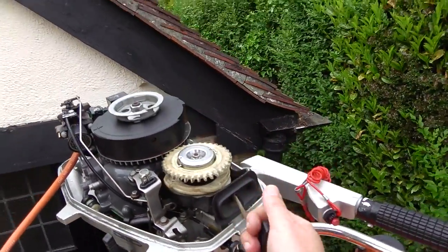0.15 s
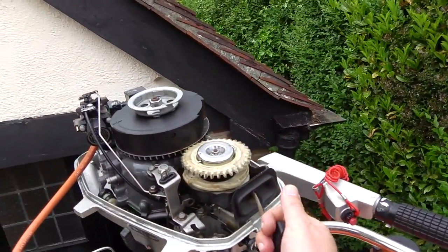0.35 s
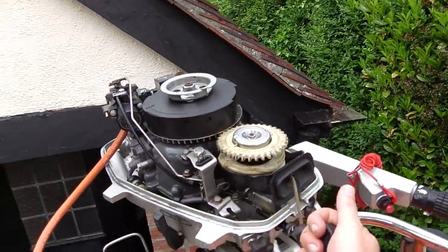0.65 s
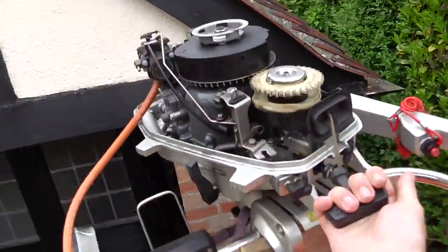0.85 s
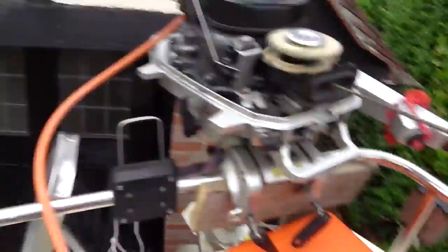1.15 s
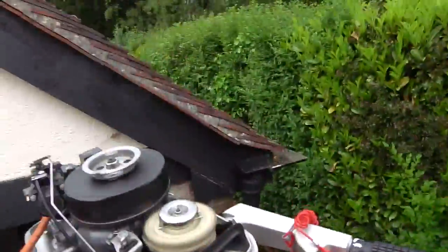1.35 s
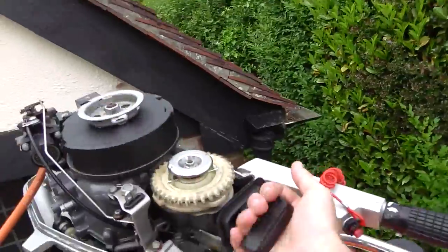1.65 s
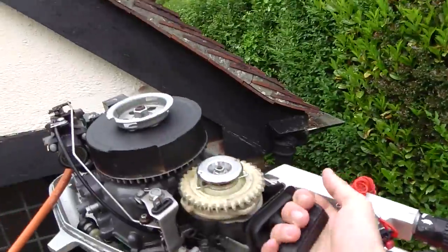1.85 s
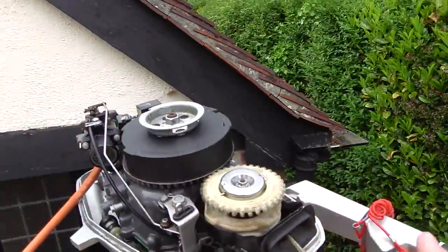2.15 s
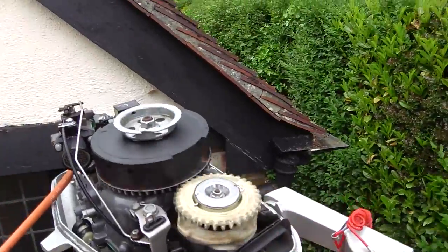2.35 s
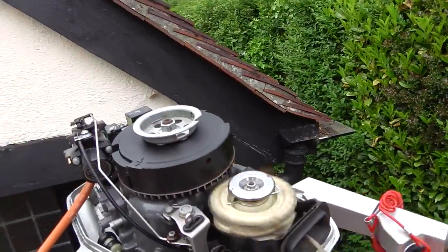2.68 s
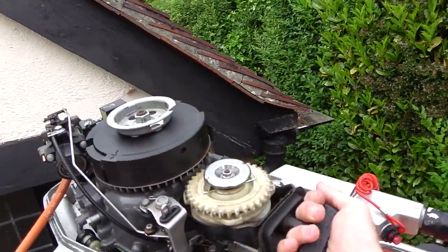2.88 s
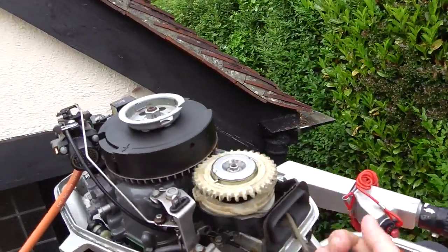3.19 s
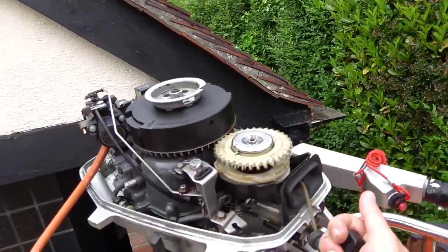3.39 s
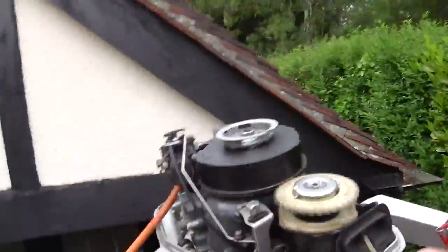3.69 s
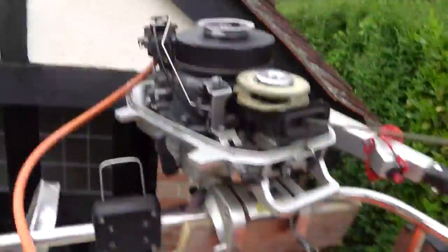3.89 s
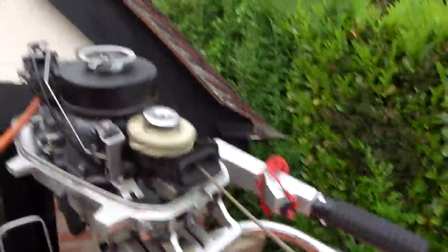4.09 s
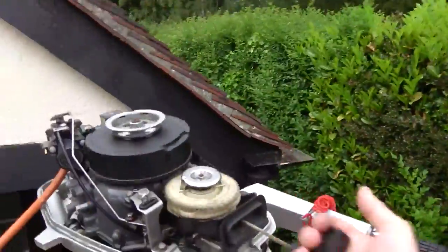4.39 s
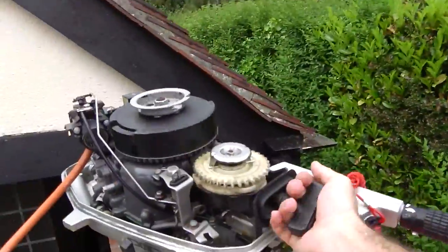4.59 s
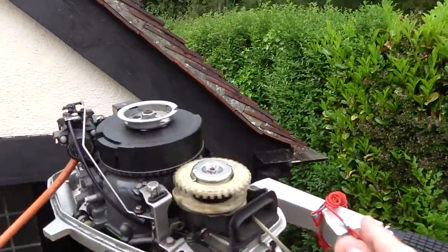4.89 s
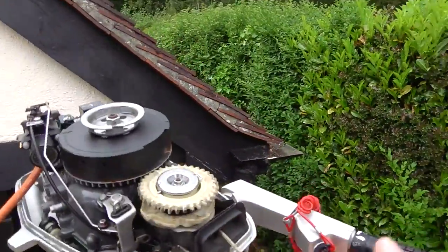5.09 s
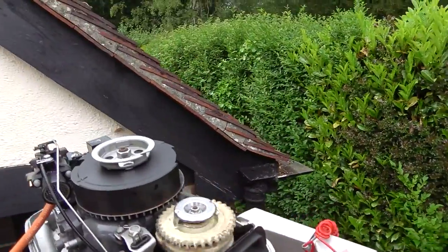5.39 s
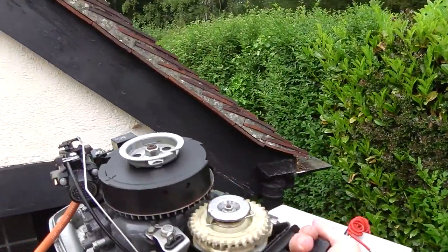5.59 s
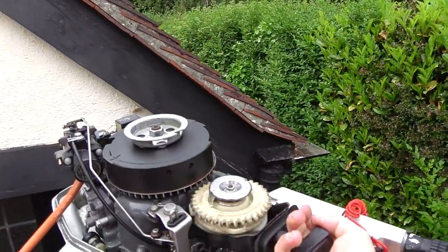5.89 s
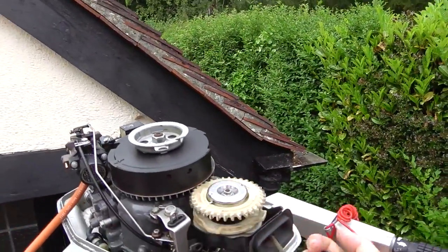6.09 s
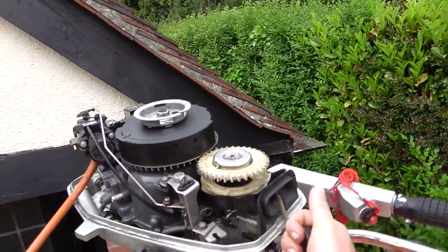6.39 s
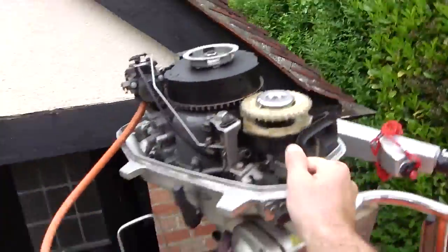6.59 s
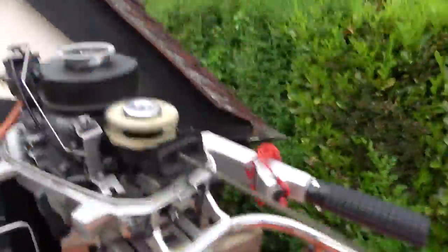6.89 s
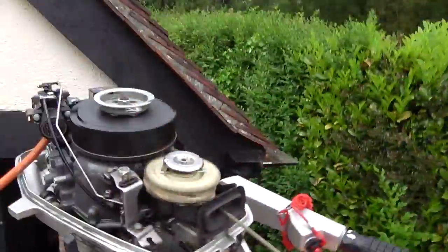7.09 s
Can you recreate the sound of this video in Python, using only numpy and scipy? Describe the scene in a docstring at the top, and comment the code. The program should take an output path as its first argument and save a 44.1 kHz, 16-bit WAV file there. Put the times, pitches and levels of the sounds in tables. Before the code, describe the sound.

Three rasping rope pulls spin a small engine that coasts down without firing, with gear clacks and soft rope slides between the pulls.

```python
"""In a garden, an uncovered outboard engine on a stand is pull-started three times and never catches.
The rope spins the starter gear (pinion) against the flywheel: filtered noise that speeds up and coasts down.
The cylinders puff through the exhaust (wavering tones and air), and the pinion clatters out (short noise hits).
The rope winds back; between pulls it is eased out until the pinion clacks into mesh.
A thin hiss of narrow noise bands goes on throughout, over a faint outdoor rumble."""
import sys
import numpy as np
from scipy import signal
from scipy.fft import rfft, irfft, next_fast_len
from scipy.io import wavfile
from scipy.ndimage import map_coordinates

SR = 44100
rng = np.random.default_rng(int(sys.argv[2]) if len(sys.argv) > 2 else 0)


def output_pcm(signal):
    """Save a mono or channel-first signal as 16-bit PCM at the path in sys.argv[1].

    Samples are clipped to [-1, 1] before scaling.
    """
    pcm = np.clip(np.atleast_2d(signal).T, -1, 1) * 32767
    wavfile.write(sys.argv[1], SR, np.round(pcm).astype(np.int16))


N = 319725
TIME = np.arange(N) / SR


# hard pulls on the rope: yank t/s, full speed t/s, let go t/s, flywheel stopped t/s, level/dB, jolt level/dB
ROPE_PULLS = [(1.022, 1.11, 1.29, 1.75, -13.8, -32.5), (3.759, 3.9, 4.046, 4.65, -13.5, -21),
              (6.709, 6.83, 6.985, 7.5, -13.5, -19)]
# rope eased out or winding back: start t/s, fastest t/s, end t/s, level/dB, treble relative to gear level/dB
ROPE_SLIDES = [(.92, 1.03, 1.1, -33, -8), (2.16, 2.43, 2.54, -21.5, -10.5), (2.438, 2.5, 2.68, -40, -8),
               (2.68, 2.781, 3.04, -34, -3), (4.45, 4.72, 4.9, -31.5, -14), (4.93, 5.069, 5.17, -27, -14),
               (5.1, 5.15, 5.36, -39, -9.5), (5.42, 5.513, 5.68, -38.5, 0), (6.45, 6.679, 6.74, -44, 4)]
# the gear unloads when let go, then coasts this much quieter and slows
LET_GO_S, COAST_DB, RUN_DOWN_DB_PER_S = .04, -7.5, 19
PULL_TREBLE_DB, COAST_TREBLE_DB = -6.5, -8.5  # rope fibres relative to the gear
SPIN_S, SPIN_DB, SPIN_TREBLE_DB = .09, -23, -11  # the thrown pinion whirrs on its shaft for a moment


def drive():
    """Strength of the gear's whirr and the rope's rasp: pulls speed up, hold and coast; slides swell and stop."""
    moves = []  # (gear strength over time, rope treble dB relative to it)
    for start, fastest, end, db, treble_db in ROPE_SLIDES:
        swell = stroke(start, fastest, fastest, end) ** 1.3
        moves.append((amp(db) * swell, treble_db))
    for yank, full, let_go, stopped, db, _ in ROPE_PULLS:
        pulled = stroke(yank, full, let_go, let_go + LET_GO_S)
        moves.append((amp(db) * pulled, PULL_TREBLE_DB))
        slowing = amp(COAST_DB - RUN_DOWN_DB_PER_S * np.maximum(TIME - let_go, 0))
        coasting = slowing * stroke(let_go, let_go + LET_GO_S, stopped - LET_GO_S, stopped)
        moves.append((amp(db) * coasting, COAST_TREBLE_DB))
    for s, *_ in PINION_THROWS:
        spin = stroke(s, s, s + SPIN_S / 2, s + SPIN_S)
        moves.append((amp(SPIN_DB) * spin, SPIN_TREBLE_DB))
    gear = sum(gain for gain, _ in moves)
    rope = sum(gain * amp(treble_db) for gain, treble_db in moves)
    return gear, rope


# where the starter housing resonates: f/Hz, width/Hz, starting level/dB
HOUSING_MODES = [(754, 145, -17.5), (1160, 310, -14), (1566, 180, -10), (1987, 660, -1.5), (2581, 53, -7),
                 (2940, 280, -9), (3157, 86, -9), (3780, 220, -9.5)]
# tone of the rope's rasp: f/Hz, level per Hz/dB
ROPE_RASP = [(3000, -5.5), (4000, 0), (4620, -4), (5410, 2), (6110, -1.5), (9830, -3.5), (12200, -9),
             (14300, -10.5), (16000, -19)]


def starter():
    """Rope and gear teeth rasp through the starter housing; the rope's fibres add treble."""
    gear, rope = drive()
    # a louder movement counts as a faster one, so the teeth mesh more often
    speed = np.sqrt(gear / amp(-13))
    tooth_hz = 930 * speed * (1 + 0.0486 * wobble(60))
    teeth = amp(2.0 * np.sin(2 * np.pi * np.cumsum(tooth_hz) / SR))
    whirr = 0
    for hz, width, db in HOUSING_MODES:
        # each mode swells and fades unevenly; slow rubbing favours the low ones
        tilt_db = 9.5 * (speed - 1) * np.log2(hz / 1600)
        mode = resonant(teeth * grit(spread_db=2), [(hz, width, 0)])
        whirr = whirr + amp(db + 5.17 * wobble(22) + tilt_db) * mode
    fibres = coloured(teeth * grit(spread_db=2), ROPE_RASP)
    return amp(1.8 * wobble(130)) * (gear * radiated(whirr) + rope * fibres)


def radiated(x):
    """The small housing sends out its middle range best and weakens towards both ends."""
    radiation = [(250, -4), (650, -2.0), (3800, -6), (6000, -14.5)]  # f/Hz, level/dB
    return filtered(x, lambda hz: amp(along(radiation, hz)))


# the last of the rope zips in: start t/s, full speed t/s, braking t/s, end t/s, level/dB
ROPE_ZIP = (1.75, 1.79, 1.8273, 1.87, -14.5)


def rewind():
    """The spring whips the rope's end through its guide, heard as gritty noise through the guide's resonances."""
    start, full, braking, end, db = ROPE_ZIP
    guide = [  # f/Hz, width/Hz, level/dB
        (855, 180, -13.5), (2190, 350, -0.5), (2920, 240, 2.5),
        (3840, 360, -6), (5420, 470, -11.5), (9300, 1800, -16.5)]
    return amp(db) * stroke(start, full, braking, end) * resonant(grit(spread_db=-2.5), guide)


# pinion and pawl contacts; square ones knock, glancing ones tick, scraping ones last longer:
# t/s, clack level/dB, knock relative level/dB, t60/s (time to fade by 60 dB)
CONTACTS = [(1.345, -13, 2, 0.047), (1.367, -13, -20, 0.053), (1.472, -18, -23, .025),
            (1.615, -17, -8, .018), (1.682, -13, -7.5, .02), (2.015, -26, -21, 0.032),
            (2.127, -15, 1.5, .03), (2.627, -25.5, -5, .034), (2.659, -25.5, -8, 0.026),
            (2.735, -16.5, -10, 0.054), (2.954, -31, -3.5, .1), (3.193, -20.5, -23, .026),
            (3.3064, -15, 4.5, .024), (4.233, -20.5, -3, .13), (4.304, -19, -4, 0.084),
            (4.355, -15.5, -5.5, 0.072), (4.4271, -16.5, -13, 0.0079), (4.461, -23, -2, .042),
            (4.863, -22.5, -10.5, 0.033), (4.9394, -11, 0.5, 0.017), (4.948, -17, -4, .018),
            (5.268, -35.5, 4.5, 0.066), (5.36, -31.5, -20, .03), (5.48, -33, -18, 0.03),
            (5.519, -31, -16, 0.051), (5.549, -16, -3, .036), (5.713, -20.5, -8, 0.03),
            (5.964, -32, -22, .036), (6.119, -19.5, 6, .04), (6.408, -37, 5.5, .05),
            (7.074, -14, -15, 0.075), (7.093, -14, 1.5, .046), (7.187, -20, -1.5, 0.039),
            (7.242, -11.5, -12.5, .06)]
# the pinion is thrown out of mesh after each pull: t/s, clack level/dB, knock relative level/dB, chime level/dB
PINION_THROWS = [(1.509, -14, -15.5, -2), (4.099, -4.5, -4, -13), (7.0384, -5, -.5, -20)]
BITE_S, BITE_DB = .05, -19.5  # the pinion bites this long after the yank
THROW_T60_S, CATCH_S, CATCH_DB = 0.05, .0055, -14.5  # a tooth catches just before the pinion flies out
TICK_DB, TICK_PER_KNOCK = -4, -0.23  # tick relative to clack; dB of tick per dB of knock


def blows():
    """Every pinion contact: (s, clack dB, knock dB relative, tick dB relative, t60 s); more knock means less tick."""
    rows = list(CONTACTS)
    rows += [(yank + BITE_S, BITE_DB, -6, .04) for yank, *_ in ROPE_PULLS]
    for s, db, knock_db, _ in PINION_THROWS:
        rows.append((s - CATCH_S, CATCH_DB, knock_db + 6.5, .04))
        rows.append((s, db, knock_db, THROW_T60_S))
    return [(s, db, knock_db, TICK_DB + TICK_PER_KNOCK * knock_db, t60)
            for s, db, knock_db, t60 in rows]


# resonances of the plastic pinion: f/Hz, width/Hz, level/dB
PINION_MODES = [(618, 265, -7.5), (778, 73, 0.5), (1145, 180, 7), (1522, 290, 1.5)]
# tone of the clack in the housing: f/Hz, level per Hz/dB
CLACK_TONE = [(1200, -45), (1800, 1.5), (2050, 5.5), (2300, 4.5), (2900, 4), (3600, 4), (4100, 0.5),
              (4800, -75)]
# tone of the tick on the flywheel's teeth: f/Hz, level per Hz/dB
TICK_TONE = [(3300, -10.5), (4200, 4.5), (5100, 7.5), (6500, 1.5), (10000, 1), (12500, -4), (14300, 2),
             (16000, -24)]


def contacts():
    """Each contact knocks the plastic pinion, clacks in the housing and ticks on the flywheel's teeth."""
    knock = resonant(noise(), PINION_MODES)
    clack = coloured(noise(), CLACK_TONE)
    tick = coloured(grit(spread_db=-2.0), TICK_TONE)
    track = np.zeros(N)
    for s, db, knock_db, tick_db, t60 in blows():
        for carrier, part_db, graze_db in ((knock, knock_db, -19), (clack, 0, -22), (tick, tick_db, -26)):
            level = amp(db + part_db)
            add(track, s, level * struck(carrier, s, t60, attack=0.00032, head=0.0051))
            # the teeth graze each other just before they meet: a short hit turned backwards
            graze = struck(carrier, s - .1, .025, attack=.0004, head=.008)[:SR // 50][::-1]
            add(track, s - len(graze) / SR, level * amp(graze_db) * graze)
    return track + rattle(clack + amp(-11) * knock + amp(-9.5) * tick)


RATTLE_PER_S, RATTLE_DB, RATTLE_SPREAD_DB = 34, -20.5, 9  # rate, strongest start level, random range below it


def rattle(light):
    """Light, uneven contacts of the freed pinion, fading as the flywheel runs down."""
    track = np.zeros(N)
    for _, _, let_go, stopped, _, _ in ROPE_PULLS:
        for slot, (late, force) in enumerate(rng.random(size=(24, 2))):
            since = LET_GO_S + (slot + late) / RATTLE_PER_S
            s = let_go + since
            db = RATTLE_DB - RATTLE_SPREAD_DB * force - RUN_DOWN_DB_PER_S * since / 2
            if s < min(stopped, TIME[-SR // 100]):
                add(track, s, amp(db) * struck(light, s, 0.033, attack=0.00056, head=0.0064))
    return track


# ringing tones of the steel flywheel: f/Hz, level/dB, t60/s
FLYWHEEL_TONES = [(2546, 0, .19), (2778, -4, .16), (3122, -13, .2), (10140, -24, .25)]
# the pawl slips off a tooth and its spring pings: t/s, level/dB
SPRING_PINGS = [(1.367, -23), (2.738, -17), (5.521, -31), (5.553, -23), (7.093, -26)]
PING_HZ, PING_T60_S, PING_SHARE_DB = 14140, 0.05, -27  # contacts stir the spring only by this share of their tick


def steel():
    """Contacts ring the flywheel faintly; the pinion dropping out sets it chiming; the pawl spring pings."""
    track = np.zeros(N)
    t = np.arange(SR // 2) / SR
    strikes = [(s, chime_db) for s, _, _, chime_db in PINION_THROWS]
    strikes += [(s, db - 24) for s, db, *_ in CONTACTS]
    for s, db in strikes:
        for hz, level_db, t60 in FLYWHEEL_TONES:
            fade = np.exp(-np.log(1000) * t / t60)
            tone = np.sin(2 * np.pi * (hz * t + rng.random()))
            add(track, s, amp(db + level_db + rng.normal(0, 1)) * fade * tone)
    # the small pawl spring adds a short, very high ring
    spring = resonant(noise(), [(PING_HZ, 160, 0)])
    pings = list(SPRING_PINGS)
    pings += [(s, db + tick_db + PING_SHARE_DB) for s, db, _, tick_db, _ in blows()]
    for s, db in pings:
        add(track, s, amp(db) * struck(spring, s, PING_T60_S, attack=.0004, head=.006))
    return track


# compression let out through the exhaust: t/s, level/dB, suddenness 0-1
EXHAUST_PUFFS = [(1.158, -21, .22), (1.278, -22.5, 0.5), (1.41, -35, .3), (2.47, -39, 0.3),
                 (2.648, -17, .63), (3.942, -17, .15), (4.06, -29, 0.45), (4.185, -29, .25),
                 (5.16, -35, 0.28), (5.352, -14, 0.66), (6.874, -23, 0.1), (6.98, -29, 0.52),
                 (7.125, -25.5, .48)]
# tones of the exhaust pipe, lowest first: f/Hz, level/dB
PIPE_MODES = [(101, 2), (183, 3), (262, -4), (335, -18), (680, -11.5)]
PIPE_T60_S, PIPE_GROWTH_PER_DB = .21, 0.0566  # the pipe's ring after a -20 dB puff; stronger puffs ring longer


def exhaust():
    """Released compression rings the exhaust pipe; a sudden release reaches its upper modes and rushes with air."""
    track = np.zeros(N)
    # seconds passed for each mode, running slightly unevenly so its pitch wavers
    waver = [np.cumsum(1 + 0.092 * wobble(90)) / SR for _ in PIPE_MODES]
    rush = coloured(noise(), [(400, 7), (800, 2.0), (3500, -0.5), (5000, -17.0)])
    for s, db, sudden in EXHAUST_PUFFS:
        start = round(s * SR)
        t60 = PIPE_T60_S * np.exp(PIPE_GROWTH_PER_DB * (db + 20))
        ring = 0
        for k, (hz, level_db) in enumerate(PIPE_MODES):
            share = sudden if k else 1
            ring = ring + amp(level_db) * share * np.sin(2 * np.pi * hz * (waver[k] - waver[k][start]))
        add(track, s, amp(db) * struck(ring, s, t60, attack=0.0027, head=0.056))
        add(track, s, amp(db - 7) * sudden * struck(rush, s, t60, attack=0.011, head=0.063))
    return track


def squeak():
    """One brief squeak at the start of the strongest puff: a pure tone in a bell-shaped burst."""
    burst = np.exp(-((TIME - 5.356) / 0.0049) ** 2)
    return amp(-17.0) * burst * np.sin(2 * np.pi * 2300 * TIME)


# resonances of the wooden stand: f/Hz, width/Hz, level/dB
STAND_MODES = [(200, 225, 0), (370, 150, 1.5), (533, 77, -1), (722, 470, -6.5)]
RUMBLE_DB, RUMBLE_TAIL_S = -41.5, .1  # rumble under a turning engine; it outlasts the flywheel this long
BITE_JOLT_DB, JOLT_T60_S = -8.5, 0.17  # the pinion's bite jolts the stand again, relative to the yank


def stand():
    """The yank shakes the engine on its wooden mount, which rumbles on while the flywheel turns."""
    wood = resonant(noise(), STAND_MODES)
    turning = sum(stroke(yank, full, let_go, stopped + RUMBLE_TAIL_S)
                  for yank, full, let_go, stopped, _, _ in ROPE_PULLS)
    track = amp(RUMBLE_DB) * turning * wood
    for yank, *_, jolt_db in ROPE_PULLS:
        for s, db in ((yank, jolt_db), (yank + BITE_S, jolt_db + BITE_JOLT_DB)):
            add(track, s, amp(db) * struck(wood, s, JOLT_T60_S, attack=0.0016, head=0.056))
    return track


# how long the walls' answer lasts: f/Hz, t60/s
WALL_DECAY = [(1500, 0.2), (14000, 0.038)]


def walls(x):
    """The house wall and eaves answer: noise that dies away sooner in the treble is used as an echo."""
    hz, t, z = signal.stft(rng.standard_normal(SR // 2), SR, nperseg=256)
    fade = np.exp(-np.log(1000) * t / along(WALL_DECAY, hz)[:, None])
    tail = signal.istft(z * fade, SR, nperseg=256)[1]
    return signal.fftconvolve(x, tail / np.linalg.norm(tail))[:N]


# steady hiss bands: f/Hz, width/Hz, level before the overall hiss level/dB
STEADY_HISS = [(2236, 66.5, 9), (3910, 126, 2.5), (11540, 340, 1.5), (13700, 240, -6)]
# drifting hiss bands: f/Hz, width/Hz, level before the overall hiss level/dB
DRIFTING_HISS = [(5620, 590, -3.5), (7135, 283, 4)]
# low hum at the start: f/Hz, width/Hz, level/dB, fading from t/s, gone t/s
LOW_HUM = (65, 5, -44.5, 0.7, 1)
# outdoor rumble over time, before a slight wobble: t/s, level/dB
GARDEN_LEVEL = [(0, -41), (.9, -43.5), (1.9, -44), (3.5, -45), (6.4, -41)]
# tone of the outdoor rumble: f/Hz, level per Hz/dB
GARDEN_TONE = [(20, -32), (66, 9.5), (105, 3), (200, -1.5), (450, -3.5), (1000, -3), (1800, -8),
               (3000, -11.5), (9000, -20.5), (16000, -15)]
HISS_DB, HISS_DIP_DB, HISS_LIFT = -55.5, 9, .1  # each pull makes the hiss quieter and its drifting bands higher
HISS_RECOVERY_S, HISS_REST, HISS_WANDER = 1.6, 0.99, 0.0065  # return time; pitch ratio at rest; random share


def background():
    """Outdoor rumble, a fading hum, and a thin hiss that dips with each pull; its drifting bands rise and sink."""
    dip = sum(stroke(yank, stopped, stopped, stopped + HISS_RECOVERY_S)
              for yank, _, _, stopped, _, _ in ROPE_PULLS)
    pitch = HISS_REST + HISS_LIFT * dip + HISS_WANDER * wobble(2)
    # reading the noise faster raises its pitch
    drifting = map_coordinates(banded(DRIFTING_HISS), [np.cumsum(pitch)], mode="mirror")
    hiss = amp(HISS_DB - HISS_DIP_DB * dip) * (banded(STEADY_HISS) + drifting)
    hz, width, db, fading, gone = LOW_HUM
    hum = amp(db) * (1 - ramp(fading, gone)) * unit(banded([(hz, width, 0)]))
    rumble = amp(curves(GARDEN_LEVEL)[0] + wobble(22)) * coloured(noise(), GARDEN_TONE)
    return hiss + hum + rumble


def amp(db):
    """Decibels to a plain gain."""
    return 10 ** (np.asarray(db) / 20)


def unit(x):
    """x scaled to rms 1."""
    return x / np.sqrt(np.mean(x ** 2) + 1e-20)


def along(points, hz):
    """Straight lines between (Hz, value) points on a log frequency axis."""
    f, v = np.transpose(points)
    return np.interp(np.log(hz + 1), np.log(f + 1), v)


def curves(rows):
    """One value per sample for each column after the time."""
    s, *cols = np.transpose(rows)
    return [np.interp(TIME, s, c) for c in cols]


def ramp(start, end):
    """A straight rise from 0 at start to 1 at end."""
    return np.clip((TIME - start) / max(end - start, 1e-3), 0, 1)


def stroke(start, full, easing, end):
    """Attack, hold and release of one movement, 0-1."""
    return ramp(start, full) * (1 - ramp(easing, end))


def wobble(rate):
    """A smooth random curve, rate knots a second."""
    return map_coordinates(rng.standard_normal(int(N * rate / SR) + 4), [TIME * rate])


def noise():
    """White noise of rms about 1."""
    return rng.standard_normal(N)


def grit(spread_db):
    """Noise made of tiny slips of unequal strength."""
    return unit(noise() * amp(spread_db * wobble(1500)))


def filtered(x, response):
    """x times a complex response of frequency."""
    m = next_fast_len(N + SR // 2)
    return irfft(rfft(x, m) * response(np.fft.rfftfreq(m, 1 / SR)), m)[..., :N]


def coloured(x, spectrum):
    """x through a smooth spectrum, at rms 1."""
    return unit(filtered(x, lambda hz: amp(along(spectrum, hz))))


def resonant(x, modes):
    """x through (Hz, width Hz, dB) resonances of alternating sign, at rms 1."""
    def body(f):
        return sum((-1) ** k * amp(db) * 1j * f * w / (c * c - f * f + 1j * f * w)
                   for k, (c, w, db) in enumerate(modes))
    return unit(filtered(x, body))


def banded(bands):
    """Noise in smooth (Hz, width Hz, dB) bands; a 0 dB band 100 Hz wide has about rms 1."""
    def shape(f):
        return sum(amp(db) * np.exp(-((f - hz) / width) ** 2 / 2) for hz, width, db in bands)
    return filtered(noise(), shape) * np.sqrt(SR / 400)


def struck(carrier, s, t60, attack, head):
    """The carrier rising at s and dying away, with rms 1 over its first head seconds."""
    start = round(s * SR)
    piece = carrier[start:start + SR // 2]
    t = np.arange(len(piece)) / SR
    piece = piece * amp(-60 * t / t60) * (1 - np.exp(-t / attack))
    return piece / np.sqrt(np.mean(piece[t < head] ** 2) + 1e-20)


def add(track, s, sound):
    """Mix a sound into the track from s on."""
    start = round(s * SR)
    track[start:start + len(sound)] += sound[:N - start]


# how much the two channels differ: f/Hz, gain of the side signal level/dB
SIDE_GAIN = [(120, -19), (550, -22), (1650, -51), (5000, -24.5), (14000, -7)]


def spread(near, far, far_side):
    """Two channels: nearly the same around 1.6 kHz, scattered in the treble, where the right is slightly louder."""
    scatter = rng.standard_normal(SR // 60) * np.linspace(1, 0, SR // 60) ** 2
    side = signal.fftconvolve(near, scatter / np.linalg.norm(scatter))[:N] + far_side
    side = filtered(side, lambda hz: amp(along(SIDE_GAIN, hz)))
    middle = near + far

    def lean(hz):
        lean_db = along([(2000, 0.017), (12000, 0.22)], hz)
        return amp(lean_db * np.array([[-1], [1]]))
    return filtered(np.array([middle + side, middle - side]), lean)


def scene():
    """The engine up close, with walls and background drawn separately for the middle and the side."""
    engine = starter() + rewind() + contacts() + steel() + exhaust() + squeak() + stand()

    def surroundings():
        return amp(-18.0) * walls(engine) + background()
    return spread(engine, surroundings(), amp(1.5) * surroundings())


SPLIT_HZ, LEAD_S, TOP_HZ = 4150, .0217, 15800  # treble above the split comes early; nothing passes above the top


def record(dry):
    """The camera cuts deep bass, passes its treble a moment ahead of the rest, clips and ends at its band limit."""
    def camera(hz):
        low_cut = (1j * hz / (1j * hz + 28)) ** 2
        early_treble = np.where(hz > SPLIT_HZ, np.exp(2j * np.pi * hz * LEAD_S), 1)
        return low_cut * early_treble
    skewed = filtered(dry, camera)
    return filtered(np.clip(skewed, -.98, .98), lambda hz: hz < TOP_HZ)


dry = scene()
out = record(dry)
output_pcm(out)
```